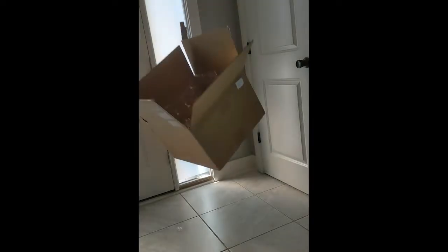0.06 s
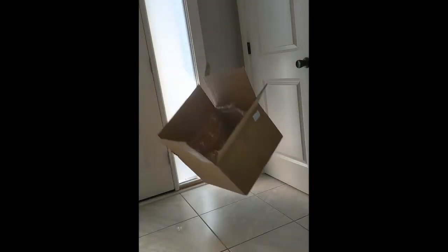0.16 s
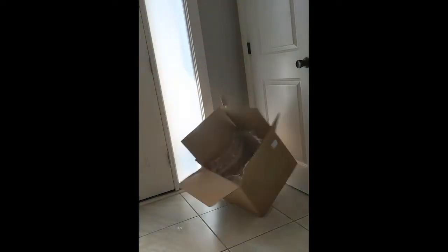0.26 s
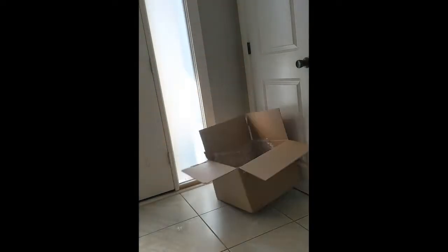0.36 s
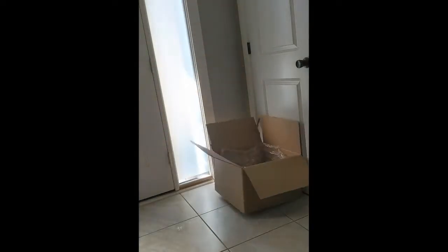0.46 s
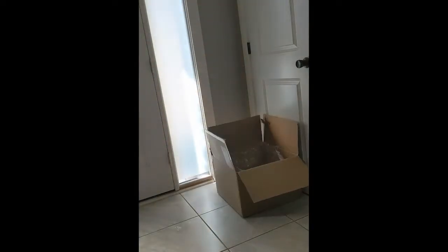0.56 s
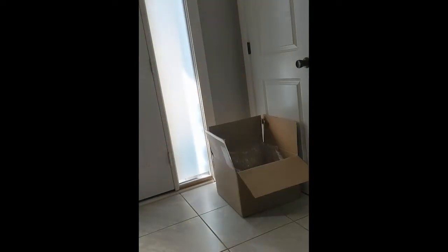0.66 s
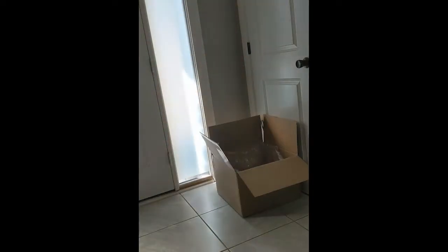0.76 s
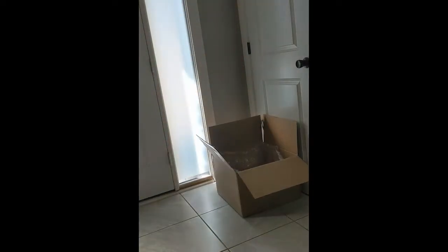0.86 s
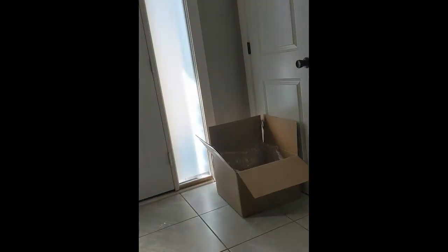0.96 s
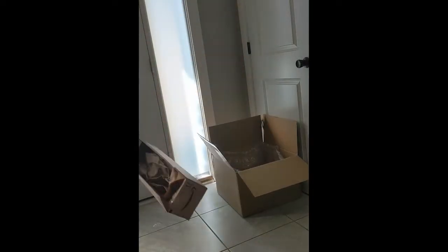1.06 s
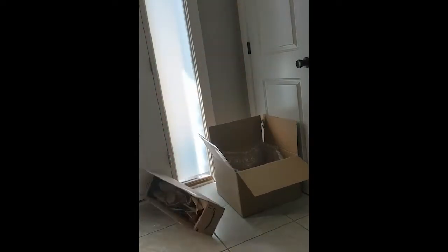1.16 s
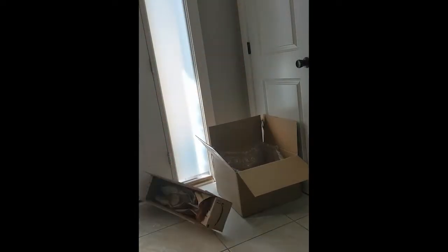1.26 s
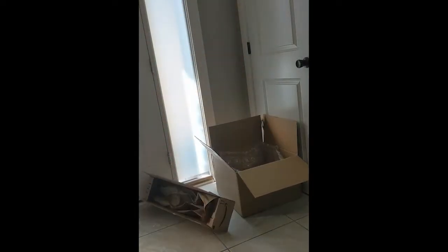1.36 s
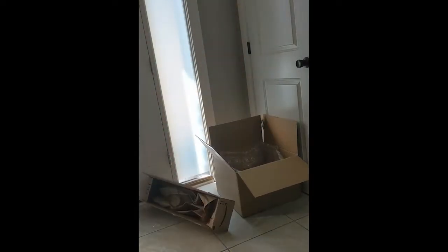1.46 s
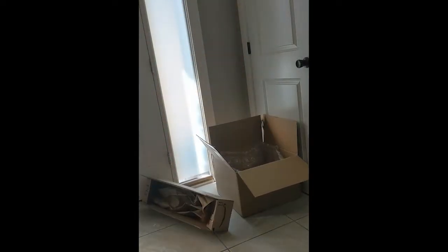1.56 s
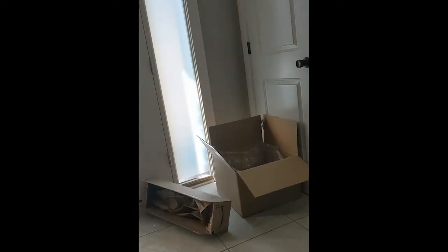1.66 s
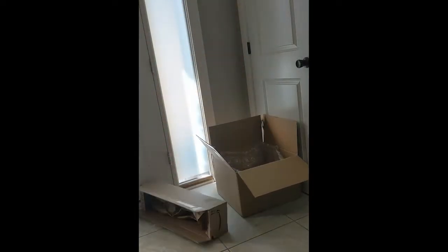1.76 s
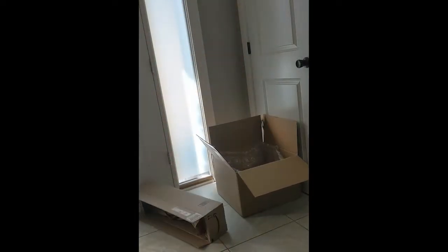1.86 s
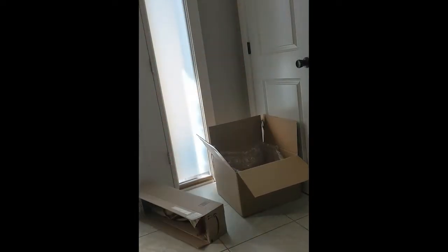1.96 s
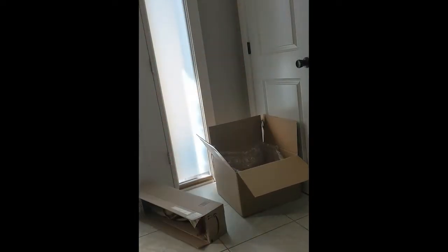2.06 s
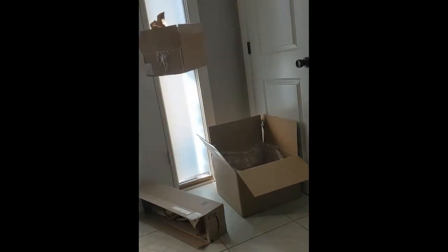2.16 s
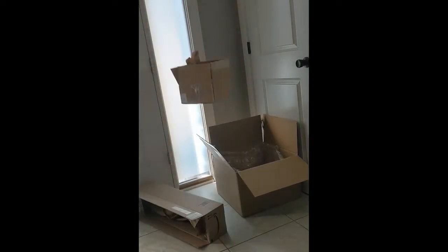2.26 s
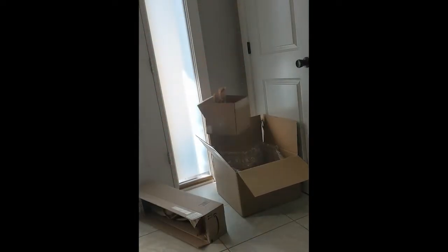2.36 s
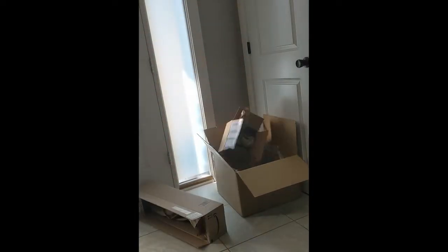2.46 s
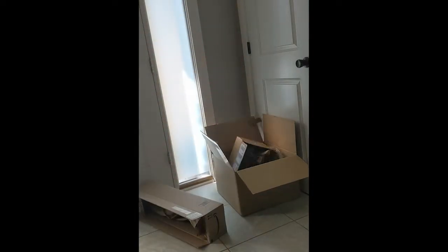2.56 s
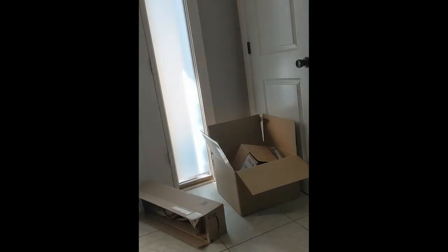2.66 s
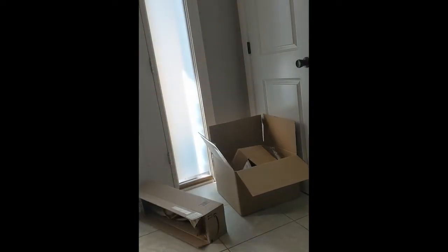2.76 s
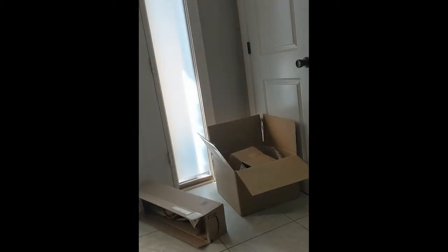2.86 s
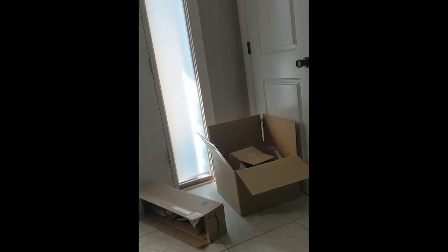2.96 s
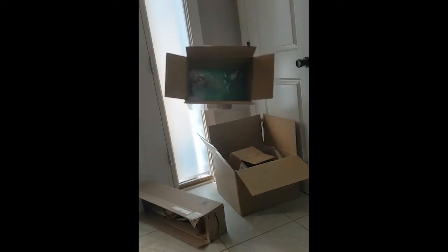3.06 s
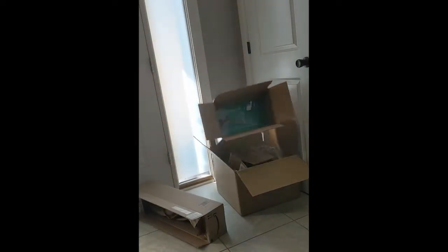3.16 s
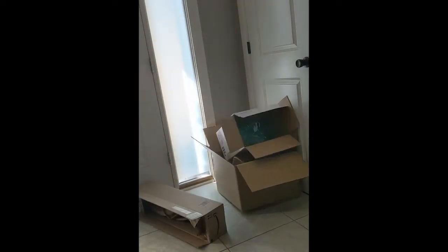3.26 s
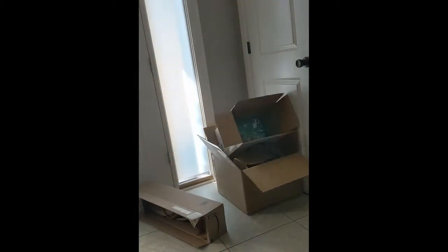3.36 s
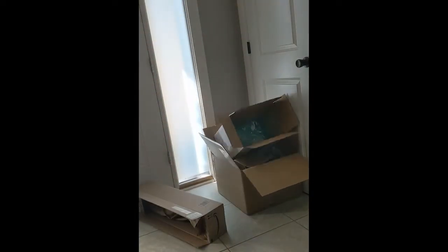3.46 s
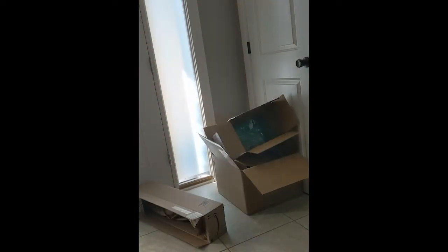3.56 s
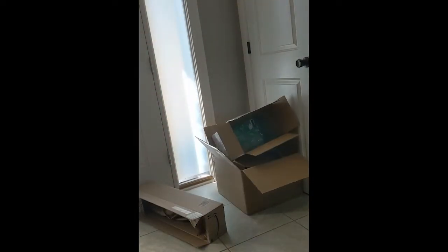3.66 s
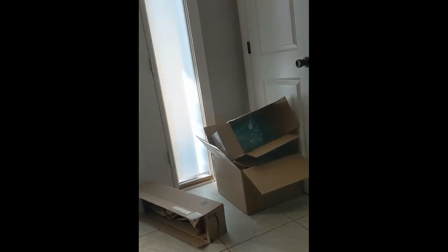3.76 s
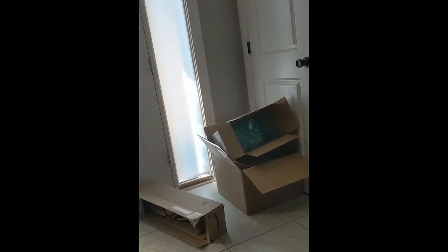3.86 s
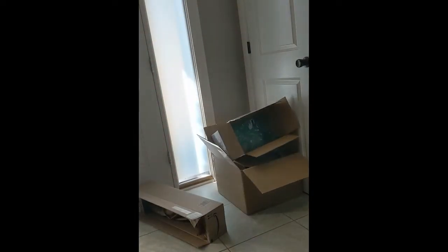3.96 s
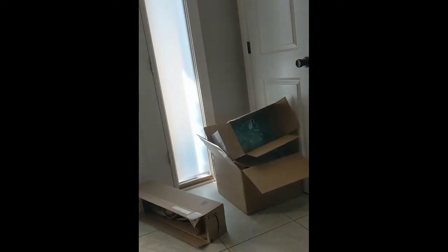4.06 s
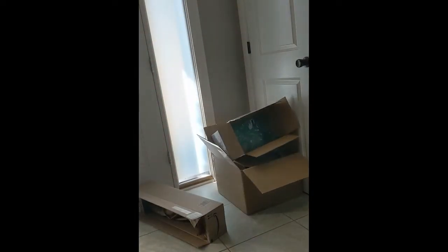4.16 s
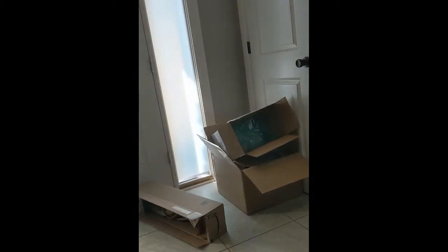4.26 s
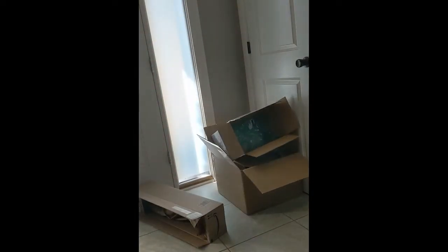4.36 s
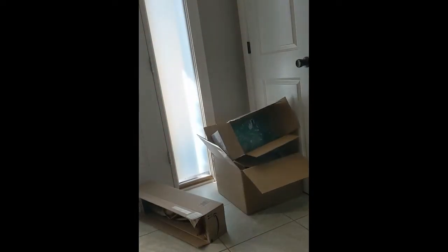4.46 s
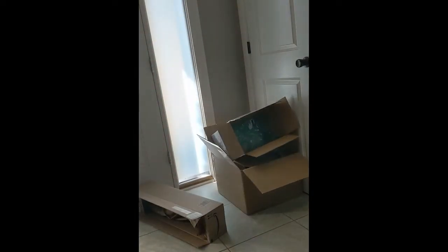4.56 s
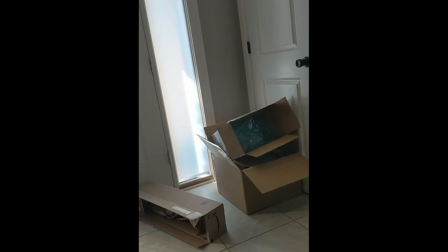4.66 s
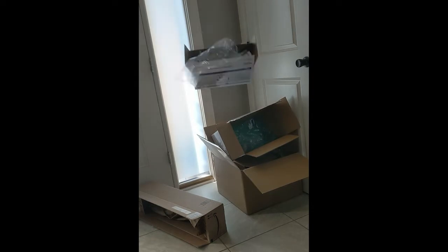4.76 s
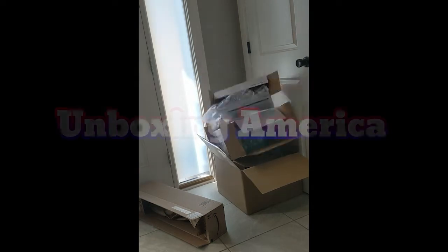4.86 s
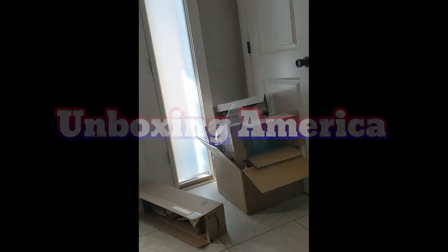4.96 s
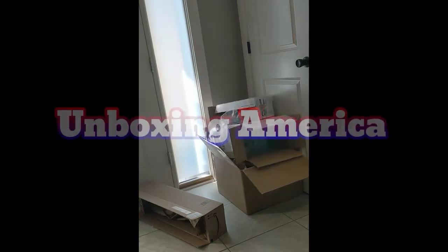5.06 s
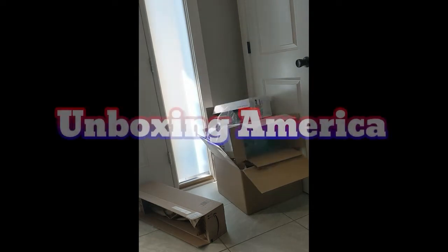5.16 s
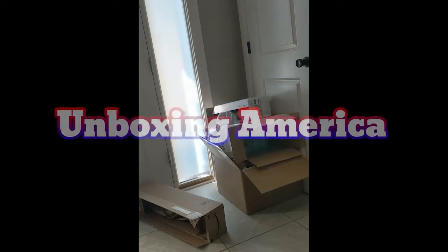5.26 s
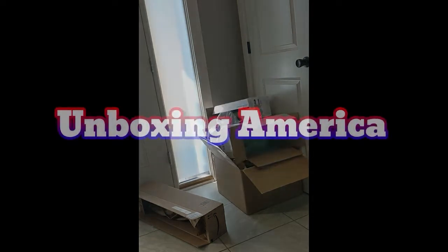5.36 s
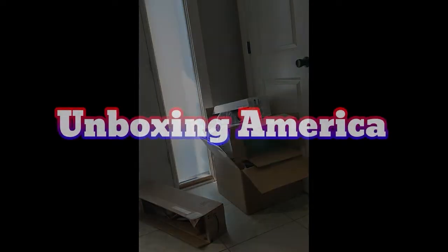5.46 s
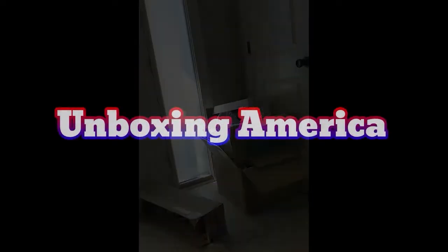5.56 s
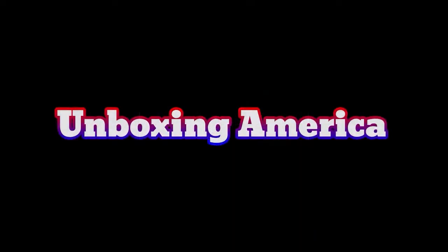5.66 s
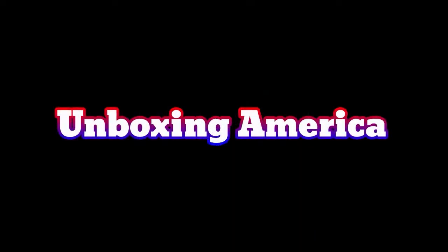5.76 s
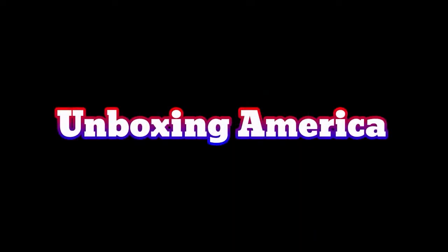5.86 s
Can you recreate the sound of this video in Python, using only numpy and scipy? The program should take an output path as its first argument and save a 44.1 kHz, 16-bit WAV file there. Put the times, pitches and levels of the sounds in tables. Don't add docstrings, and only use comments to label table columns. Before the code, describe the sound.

Five hollow cardboard thuds with abrupt cuts between them, a crisp film-like crackle before the last, then sudden silence in a tiled entryway.

```python
import sys
import numpy as np
from scipy import signal
from scipy.fft import rfft, irfft
from scipy.io import wavfile
from scipy.ndimage import uniform_filter1d

SR = 44100
rng = np.random.default_rng(int(sys.argv[2]) if len(sys.argv) > 2 else 0)


def generate_wav(sig):
    pcm = np.round(np.clip(np.atleast_2d(sig).T, -1, 1) * 32767).astype(np.int16)
    wavfile.write(sys.argv[1], SR, pcm)


def linear_from_db(decibels):
    return 10 ** (np.asarray(decibels, float) / 20)


N = 260542
SIDES = np.array([[1], [-1]])

# time in seconds; first is the start, last the end.
CUTS_S = [0, 1.045, 2.207, 3.11, 3.97, 4.79, 5.52]

# start in seconds, peak in dB, box air pitch in Hz, ring T60 in seconds, knock in dB.
BLOWS = [(0.326, -6, 315, 0.048, -5), (0.328, 3.5, 195, 0.04, -31), (0.338, 4.5, 231, 0.071, -29.5),
         (0.555, -7.5, 274, 0.083, -19), (1.243, -9, 287, 0.092, -16.5), (1.25, -10, 186, 0.094, -13),
         (1.278, -15, 193.2, 0.16, -33), (1.914, -25.5, 171, 0.092, -24), (1.95, -23, 225, 0.2, -47),
         (2.045, -47.5, 208, 0.16, -59), (2.462, 1, 390, 0.044, -34), (2.48, -5, 420, 0.1, -32),
         (2.5363, 3.5, 272.4, 0.11, -15.5), (2.589, -16, 334, 0.096, -32), (2.752, -28, 251, 0.068, -23),
         (2.782, -17, 518, 0.041, -34), (3.283, -9.5, 251, 0.066, -60), (3.301, 3.5, 241, 0.13, -24),
         (3.338, -6.5, 407, 0.22, -1), (3.408, -10, 380, 0.051, -15), (4.905, -3, 226.3, 0.079, -21.5),
         (4.938, -3.5, 290, 0.07, -29), (4.9505, -3.5, 1094, 0.044, -16.5), (4.962, -2.5, 335, 0.077, -3.5)]
# start in seconds,
# peak in dB, pitch in Hz, ring T60 in seconds.
RINGS = [(2.49, -8.5, 425.6, .05), (2.552, -7.5, 559, 0.056), (4.9415, -12, 291, 0.055),
         (1.318, -6.5, 420, 0.051), (0.183, -45, 2980, .03), (0.333, -4.5, 105.3, 0.32),
         (0.337, -13.5, 2790, 0.039), (1.03, -45.5, 1544, 0.057), (1.9, -32, 1720, 0.033),
         (1.92, -20, 511.5, 0.09), (1.969, -17.5, 190.8, 0.033), (2.471, -7.5, 416, 0.049),
         (2.5477, -1, 271.5, 0.067), (3.341, -14, 2456, 0.032), (3.352, -13.5, 2188, .03),
         (4.963, -2, 305.8, 0.062), (0.337, -16.5, 1098, 0.036), (0.345, -2.5, 816, 0.043),
         (0.36, -5, 778, 0.066), (0.358, -6.5, 209.5, .08), (0.383, -5.5, 233, 0.076),
         (0.4, -10, 325, 0.062), (1.247, -6, 1574, 0.043), (1.255, -5.5, 520, 0.14),
         (1.263, -3.5, 330, 0.044), (1.277, -7, 853, 0.033), (1.285, -11.5, 260, 0.041),
         (1.291, -4, 1607, 0.039), (1.304, -7, 486, 0.11), (1.338, -3.5, 620, 0.07),
         (1.395, -5.5, 658, 0.15), (2.461, -13, 1060, 0.025), (2.47, -16.5, 1617, 0.11),
         (2.472, -5.5, 897, 0.024), (2.544, 1, 691, 0.045), (2.582, -6.5, 692, 0.032),
         (2.576, -18.5, 1700, 0.029), (3.279, -29.5, 1600, 0.033), (3.319, 1, 263, 0.03),
         (3.328, -4, 856, 0.054), (3.331, -0.5, 450, 0.053), (3.373, -23, 1650, 0.044),
         (3.405, -11.5, 617, .03), (3.412, -15.5, 1766, .05), (4.953, -8.5, 200, 0.038),
         (4.957, -7.5, 756, .04), (4.98, -1, 340, 0.082), (4.997, -3.5, 330, 0.061), (5.029, -9, 300, 0.25),
         (5.064, -3.5, 330, 0.042),
         (.558, -8.5, 300, 0.051), (.566, -11, 200, .05), (2.7545, -19, 1200, .03), (1.25, -6, 201.3, .1),
          (1.455, -19, 1550, .05), (4.289, -17, 550, .05), (4.323, -11, 860, .06), (4.387, -14, 900, .05),
          (4.4, -14.5, 600, .05), (4.406, -11, 1000, .04), (3.305, -2.5, 240, .07),
          (3.3097, -4.5, 240, .04), (3.335, -7.5, 520, .04), (2.4625, -7.5, 330, .04),
          (2.485, -8.5, 430, .05), (2.5376, -6, 1052, 0.016), (2.538, -5, 520, .04),
          (2.555, -4.5, 275, .08), (4.9099, -6.5, 230, .05), (4.952, -4.5, 600, .03),
          (4.953, -8, 1150, .04), (5.003, -3.5, 320, .05), (5.035, -9.5, 310, .05), (1.256, -5, 560, .03),
          (1.287, -4, 250, .04), (1.307, -5.5, 300, .04), (1.342, -8, 640, .04), (1.374, -15.5, 1550, .05),
          (1.41, -15.5, 1550, .05), (1.45, -15, 1000, .06), (1.41, -8, 700, .05), (1.47, -20, 950, .05),
          (1.28, -13, 1600, .04)]

# start in seconds, panel, hollow and corrugation levels in dB,
# hold in seconds.
JOLTS = [(0.163, -72.5, -69.5, -59.5, 0.036), (0.326, -16.5, -14, -24, 0.026),
         (0.387, -20.5, -34.5, -37.5, 0.096), (0.548, -17, -26, -32.5, 0.0071),
         (0.631, -29, -64, -40, 0.022), (1.242, -14, -13, -22, 0.014), (1.263, -12.5, -14, -17.5, 0.046),
         (1.304, -35.5, -18, -31, 0.035), (1.384, -27, -21.5, -31, 0.061),
         (1.904, -35.5, -36, -43.5, 0.037), (2.029, -35, -44.5, -57, 0.017),
         (2.458, -15.5, -26, -31, 0.021), (2.53, -20.5, -22.5, -32, 0.05),
         (2.744, -37, -34.5, -42.5, 0.039), (2.842, -52, -50.5, -51.5, 0.12),
         (3.294, -15.5, -18.5, -29, 0.066), (3.333, -13.5, -24, -20.5, 0.015),
         (3.677, -49, -45, -47.5, 0.022), (3.86, -57, -54, -57.5, 0.029), (2.184, -75.5, -55.5, -60, 0.14),
         (4.904, -18.5, -26, -34.5, 0.038), (4.946, -11.5, -12.5, -22, 0.032),
         (5.051, -22.5, -31, -33, 0.018), (5.258, -40.5, -41, -48.5, 0.011)]
NUDGES = [
    (0.019, -86, -61, -61.5, 0.058),
    (1.008, -63, -77, -61.5, 0.019),
    (1.17, -61.5, -61, -65, 0.049),
    (1.886, -57.5, -53, -50.5, .012),
    (3.277, -60, -41.5, -53, .015),
    (4.786, -68.5, -56.5, -57.5, 0.056),
]
JOLT_RISE_S, REBOUND_DB_PER_S = 0.0082, 499
# seconds, for panel, hollow, corrugation.
JOLT_LAG_S = [.012, .003, 0.0]
# level re jolt in dB, fall in dB per second.
SETTLING = [(-3, 128.5), (0, 110), (2, 142)]

# resonance in Hz, width in Hz, level in dB.
PANELS = [(111, 41, -3), (156.6, 65.4, -2), (243, 56, 1), (267, 101.6, -0.5)]
# level in dB, by take.
BIG_PANEL_DB = [-5.5, -15.5, -7.5, -9, -9, -6.5]
# resonance in Hz, width in Hz, level in dB.
HOLLOW = [(389, 51, -3), (518, 144.6, 1), (585.6, 129, 3), (796, 310, -4), (1070, 330, -9)]
# resonance in Hz, width in Hz, level in dB.
NARROW_BOX = [(428, 57, -3.5), (534, 51, -2.5), (658, 108, -2.5), (980, 133, -12)]
# resonance in Hz, width in Hz, level in dB.
FLUTES = [(1200, 250, -2), (1510, 300, -1.5), (1940, 966, -5)]

# start in seconds, level in dB, hold in seconds, fall in dB per second.
RUSTLES = [(0.0, -58, 0.0079, 201), (0.175, -68, .02, 99.5), (0.0, -59, 0.11, 93),
           (0.33, -21.5, 0.0045, 84), (0.578, -42, 0.098, 185), (0.778, -60, 0.16, 33.5),
           (1.249, -23.5, 0.065, 354), (1.39, -55.5, 0.022, 59), (1.904, -42, 0.048, 200),
           (2.03, -51.5, .01, 150), (2.201, -57, 0.09, 75), (2.463, -30.5, 0.04, 300),
           (2.544, -31, 0.039, 120), (2.704, -43.5, 0.082, 55), (2.858, -50, 0.096, 146),
           (3.297, -28, 0.024, 195), (3.318, -23, 0.047, 252), (3.404, -35, 0.0076, 108),
           (3.687, -48.5, 0.014, 140), (3.853, -57.5, 0.037, 153), (3.97, -59.5, 0.028, 103),
           (4.004, -48.5, 0.018, 300), (4.798, -57.5, 0.043, 87), (4.91, -34.5, 0.061, 194),
           (4.963, -30.5, 0.057, 123), (5.048, -29, 0.011, 248), (5.11, -62.5, 0.0083, 100),
           (5.255, -50, 0.011, 301)]
RUSTLE_RISE_S = 0.0049
# frequency in Hz, density in dB per Hz.
FILM = [(1500, -30), (2300, -7.5), (2900, -7.5), (4300, -2), (5800, -4.5), (8000, -5), (12000, -10.5),
        (16000, -17)]
# time in seconds, dull over crisp in dB.
FOLDS = [(0, -10.5), (.17, -4.5), (.33, 0.5), (1.2, 1.5), (1.3, 5), (1.85, 2.5), (1.93, 6.5), (2.44, 4.5),
         (2.47, -3), (3.3, 1), (3.36, 1), (4.03, -1), (4.25, -2.5), (4.29, -4), (4.335, 4), (4.4, 2.5),
         (4.73, -0.5), (4.96, 1)]
CRISP_HZ = 4600
# time in seconds, pull in dB, weight on the boxes in dB.
DRAG = [
    [(4.013, -61, -68), (4.058, -47, -52.5), (4.064, -34, -50), (4.085, -32.5, -47.5), (4.135, -30.5, -50),
     (4.15, -32, -49.5), (4.167, -29.5, -36.5), (4.223, -30.5, -34), (4.24, -33.5, -42)],
    [(4.2505, -12.5, -31.5), (4.256, -19.5, -31), (4.268, -12.5, -26.5), (4.276, -14, -28),
     (4.3, -17, -27.5), (4.32, -18, -29), (4.35, -13, -25.5), (4.403, -13, -24), (4.423, -19.5, -24.5),
     (4.44, -27, -30), (4.651, -51.5, -53.5), (4.713, -52, -80), (4.785, -47.5, -58)],
]
# share in dB, for panel, hollow, corrugation.
WEIGHT_SHARE_DB = [-8.5, 2.5, 2.5]
SHEET_RIGHT_DB = 1.5
# start in seconds, level in dB, pitch in Hz, hold in seconds.
STRIPS = [
    (4.075, -46.5, 5500, .03),
    (4.252, -32.5, 5900, 0.019),
    (4.29, -31, 3600, .02),
    (4.325, -23.5, 3250, 0.017),
    (4.37, -31.5, 4300, .01),
    (4.34, -34, 6200, 0.048),
    (4.39, -36.5, 7600, 0.016),
    (3.335, -40, 3560, 0.022),
]
STRIP_WIDTH_HZ, STRIP_DB_PER_S = 470, 500.5

# start in seconds, peak in dB, pitch in Hz.
SNAPS = [(0.3283, -11, 5640), (1.2523, -19, 2840), (1.8987, -38, 2840), (2.4671, -26, 9690),
         (3.3005, -17, 7580), (3.4168, -20, 2840), (4.0151, -31, 7190), (4.0282, -21, 4740),
         (4.0472, -30, 7450), (4.0652, -24, 5120), (4.1092, -20, 5380), (4.1526, -21, 8270),
         (4.1584, -20, 5770), (4.1689, -12, 3400), (4.1761, -12, 5730), (4.1786, -13, 7060),
         (4.1972, -9, 5210), (4.1986, -9, 11000), (4.2136, -16, 9520), (4.2177, -7, 7490),
         (4.2196, -11, 5200), (4.2513, -4, 4820), (4.2687, -8, 5770), (4.2999, -8, 7540),
         (4.7063, -36, 7620), (4.7361, -27, 5990), (4.7576, -36, 5560), (4.7784, -34, 3830),
         (4.9058, -24, 2900), (4.9525, -17, 1400)]
# start in seconds, peak in
# dB, pitch in Hz.
CRINKLES = [(3.9683, -48, 7500), (3.9957, -46, 5480), (4.008, -47, 7500), (4.012, -43, 3690),
            (4.018, -36, 9500), (4.041, -38, 11500), (4.078, -33, 5700), (4.083, -31, 5200),
            (4.09, -31, 7500), (4.116, -30, 9600), (4.123, -28, 5700), (4.145, -23, 7500),
            (4.187, -23, 9600), (4.195, -26, 7500), (4.237, -21, 5700), (4.2575, -17, 7500),
            (4.353, -4, 3400), (4.657, -35, 9600), (4.682, -43, 7500), (4.743, -39, 7500),
            (4.754, -34, 5710), (4.762, -40, 3500), (4.783, -43, 7500), (2.755, -35, 1500),
            (3.342, -19, 2500), (3.367, -19, 3500), (5.068, -29, 9600)]
SNAP_DECAY_S = 0.0008
# start in seconds, level in dB, length in seconds, slips per second.
CREAKS = [
    (3.701, -50.5, 0.037, 490),
    (3.759, -61.5, 0.069, 400),
    (3.858, -56, 0.043, 445),
]

# start in seconds, door in dB, wall in dB.
SHOVES = [(0.0, -58, -58), (0.326, -22.5, -19.5), (.53, -34.5, -26), (.8, -47, -43), (1.245, -48, -35),
          (1.36, -45.5, -60), (1.92, -64, -47.5), (2.46, -53, -31.5), (2.58, -40.5, -26.5),
          (2.85, -54.5, -45), (3.29, -24, -23.5), (4.25, -63, -66), (4.909, -23.5, -27), (5.0, -42, -30),
          (5.4, -48, -59.5), (.14, -61, -77), (2.2, -73, -78), (3.12, -66, -74.5), (3.6, -48, -52),
          (4.7, -64.5, -75), (4.6, -70, -57.5)]
DOOR_HZ, DOOR_RISE_S, DOOR_HOLD_S, DOOR_DB_PER_S = 31.6, 0.13, 0.0075, 92.5
WALL_HZ, WALL_RISE_S, WALL_HOLD_S, WALL_DB_PER_S = 61.8, 0.011, 0.016, 128

RISE_FROM_DB = -12
# level in dB, for panel, hollow, corrugation, film, door, wall.
REST_DB = [-61, -67.5, -67, -70.5, -76.5, -72]
# stirring offset in dB, by take.
REST_TAKE_DB = [-1, -3.5, 1, -0.5, 2, -6.5]
STIR_DB, STIR_HZ = 3, 3.6

# frequency in Hz, T60 in seconds.
HALL_T60 = [(60, 0.92), (200, 0.42), (600, 0.54), (1500, 0.73), (4000, 0.54), (10000, 0.292)]
# frequency in Hz, level in dB.
HALL_LEVEL = [(60, -9.5), (250, 0), (600, -3), (2000, -2.5), (12000, 7.5)]
# frequency in Hz, left-right likeness 0 to 1.
HALL_LIKENESS = [(60, 0.76), (250, 0.83), (600, 0.13), (1500, 0.3), (4000, 0.068), (12000, .03)]

# frequency in Hz, density in dB.
QUIET = [(12, -25), (20, 9), (41, -1), (96, -35.5), (270, -9), (367, -10.5), (485, -26), (558, -19),
         (976, -17.5), (1060, -19), (2460, -32.5), (3440, -31), (16000, -41)]
QUIET_DB = -63

# resonance in Hz, width in Hz, lift in dB.
PORT = [(1650, 300, 3), (2100, 500, -5), (3300, 900, 5), (5700, 700, 7), (6550, 500, -4), (7600, 500, 7),
        (9700, 700, 6), (11600, 600, 6), (13900, 800, 3)]
# frequency in Hz, left minus right in dB.
LEFT_LEAD = [(60, 1), (150, 1), (400, 6.5), (1200, 0), (4400, -1), (8000, -3), (14000, 1.5)]
# frequency in Hz, left lead in radians.
LEFT_PHASE = [(50, .15), (150, .45), (400, .4), (1000, 0.36), (4000, 1.9), (16000, 4.6)]
TOP_HZ = 16150


def unit(x):
    return x / np.sqrt(np.mean(x ** 2) + 1e-30)


def at_hz(points, hz):
    table = np.array(points)
    return np.interp(np.log(np.maximum(hz, 1)), np.log(table[:, 0]), table[:, 1])


def shape(x, gain):
    n = x.shape[-1]
    return irfft(rfft(x) * gain(np.fft.rfftfreq(n, 1 / SR)), n)


def ring(x, hz, t60):
    r, w = linear_from_db(-60 / (t60 * SR)), 2 * np.pi * hz / SR
    return signal.lfilter([0, np.sin(w)], [1, -2 * r * np.cos(w), r * r], x + 1e-18)


def resonate(x, hz, width):
    r, w = np.exp(-np.pi * width / SR), 2 * np.pi * hz / SR
    return signal.lfilter(np.array([1, 0, -1]) * (1 - r * r) / 2, [1, -2 * r * np.cos(w), r * r], x)


def by_take(values):
    return np.array(values)[np.searchsorted(CUTS_S[1:-1], np.arange(N) / SR)]


def in_time(spans):
    out = np.zeros((len(spans[0][0]) - 1, N))
    for s, *levels in map(np.transpose, spans):
        a = round(s[0] * SR)
        t = np.arange(a, N) / SR
        out[:, a:] = [np.interp(t, s, level) for level in levels]
    return out


def stroke(s, db, rise, hold, fall_db):
    out = np.zeros(N)
    end = min(cut for cut in CUTS_S if cut > s + .03)
    a, b = round(max(s, 0) * SR), round(end * SR)
    t = np.arange(b - a) / SR
    rising_db = RISE_FROM_DB * np.clip(1 - t / rise, 0, 1)
    falling_db = fall_db * np.maximum(t - rise - hold, 0)
    out[a:b] = linear_from_db(2 * (db + rising_db - falling_db))
    return out


def soft_tap(length):
    tap, push = np.zeros(8192), np.hanning(length)
    tap[:length] = push / push.sum()
    return tap


def blows():
    out, t = np.zeros(N), np.arange(8192) / SR
    for (s, db, hz, t60, knock_db), noise in zip(BLOWS, rng.standard_normal((len(BLOWS), 8192))):
        tap = soft_tap(round(.6 * SR / hz))
        note = ring(tap, hz, t60) + 0.24 * ring(tap, 1.6 * hz, 0.19 * t60)
        knock = resonate(noise * np.exp(-t / 0.0039), 950, 1300)
        knock = resonate(knock, 980, 600) + 0.37 * resonate(knock, 1500, 500)
        knock /= np.abs(knock).max()
        out[round((s + .0015) * SR):][:8192] += linear_from_db(knock_db - 8.5) * knock - linear_from_db(db - 7.0) * note
    return out


def panel_rings():
    out = np.zeros(N)
    for s, db, hz, t60 in RINGS:
        out[round(s * SR):][:8192] -= linear_from_db(db - 4.5) * ring(soft_tap(round(SR / hz)), hz, t60)
    return out


def resting():
    restless_db = STIR_DB * unit(resonate(rng.standard_normal(N), STIR_HZ, 2 * STIR_HZ))
    return linear_from_db(2 * (np.array(REST_DB)[:, None] + by_take(REST_TAKE_DB) + restless_db))


def motion():
    power = resting()[:4]
    for s, *levels, hold in JOLTS + NUDGES:
        for k, (db, (under_db, fall_db)) in enumerate(zip(levels, SETTLING)):
            at = s + JOLT_LAG_S[k]
            power[k] += stroke(at, db, JOLT_RISE_S, hold, REBOUND_DB_PER_S)
            power[k] += stroke(at, db + under_db, JOLT_RISE_S, hold, fall_db)
    for s, db, hold, fall_db in RUSTLES:
        power[3] += stroke(s, db, RUSTLE_RISE_S, hold, fall_db)
    still_end = (N / SR, -120, -120)
    before = [(0, -120, -120), still_end]
    after = [(CUTS_S[5], -120, -120), still_end]
    pull_db, weight_db = in_time([before] + DRAG + [after])
    power[:3] += linear_from_db(2 * (weight_db + np.array(WEIGHT_SHARE_DB)[:, None]))
    power[3] += linear_from_db(2 * pull_db)
    return np.sqrt(power)


def grains(per_s, spread_db):
    sizes = linear_from_db(spread_db * np.minimum(rng.exponential(1, N), 4)) * rng.choice([-1, 1], N)
    return sizes * (rng.random(N) < per_s / SR) + 1e-18


def rattle(peaks, per_s, spread_db, wide):
    knocks = grains(per_s, spread_db) + wide * grains(per_s, spread_db) * SIDES
    out = np.zeros((2, N))
    for k, (hz, width, db) in enumerate(peaks):
        broad = resonate(knocks, hz, 6.8 * width)
        out += (-1) ** k * linear_from_db(db) * resonate(broad, hz, width)
    return unit(out)


def cardboard(panel, hollow, scrape):
    big = linear_from_db(by_take(BIG_PANEL_DB)) * rattle(PANELS[:1], 1000, 3.4, wide=0.18)
    out = linear_from_db(-8.0) * panel * (rattle(PANELS[1:], 1000, 2.5, wide=0.13) + big)
    narrow = by_take([0, 1, 0, 0, 0, 0])
    out += linear_from_db(-7.5) * hollow * (1 - narrow) * rattle(HOLLOW, 2500, 3.2, wide=0.36)
    out += linear_from_db(-6.5) * hollow * narrow * rattle(NARROW_BOX, 3000, 2.5, wide=0.2)
    return out + linear_from_db(-6.5) * scrape * rattle(FLUTES, 2600, 0.63, wide=0.6)


def rustle():
    clumps = linear_from_db(2.0 * unit(resonate(rng.standard_normal(N), 60, 110)))
    crinkles = (grains(8000, 2.0) + grains(8000, 2.0) * SIDES) * clumps
    film = unit(shape(crinkles, lambda hz: linear_from_db(at_hz(FILM, hz))))
    dull = shape(film, lambda hz: 1 / (1 + (hz / CRISP_HZ) ** 6))
    fold_db, = in_time([FOLDS])
    return linear_from_db(fold_db / 2) * dull + linear_from_db(-fold_db / 2) * (film - dull)


def strips(film):
    out = np.zeros((2, N))
    for s, db, hz, hold in STRIPS:
        gain = np.sqrt(stroke(s, db, RUSTLE_RISE_S, hold, STRIP_DB_PER_S))
        out += gain * unit(resonate(film, hz, STRIP_WIDTH_HZ))
    return out


def snaps(rows):
    out, t = np.zeros(N), np.arange(400) / SR
    for (s, db, hz), noise in zip(rows, rng.standard_normal((len(rows), 400))):
        burst = (noise - .2 * np.roll(noise, 1)) * np.exp(-t / SNAP_DECAY_S)
        burst = 0.98 * burst + 0.82 * resonate(burst, hz, 1700)
        out[round(s * SR):][:400] += linear_from_db(db + 7) * burst / np.abs(burst).max()
    band = signal.butter(2, [1700, 14000], "band", fs=SR, output="sos")
    return signal.sosfilt(band, out + 1e-18)


def creaks():
    slips = np.zeros(N)
    for (s, db, length, per_s), chance in zip(CREAKS, rng.standard_normal((len(CREAKS), 60))):
        at = s + np.cumsum(1 + .08 * chance) / per_s
        slips[(at[at < s + length] * SR).astype(int)] = linear_from_db(db + 5.5)
    return ring(slips, 900, .009) + .6 * ring(slips, 1760, .008) + .6 * ring(slips, 450, .015)


def boom():
    door_power, wall_power = resting()[4:]
    for s, door_db, wall_db in SHOVES:
        door_power += stroke(s, door_db, DOOR_RISE_S, DOOR_HOLD_S, DOOR_DB_PER_S)
        wall_power += stroke(s, wall_db, WALL_RISE_S, WALL_HOLD_S, WALL_DB_PER_S)
    door_gain, wall_gain = uniform_filter1d(np.sqrt([door_power, wall_power]), size=600, origin=250)
    wander = unit(resonate(rng.standard_normal(N), 2.9, 4.0))
    door = np.sqrt(2) * np.sin(2 * np.pi * np.cumsum(DOOR_HZ + 1.5 * wander) / SR)
    wall = unit(resonate(resonate(rng.standard_normal(N), WALL_HZ, 35), WALL_HZ, 35))
    return door_gain * door + linear_from_db(-2.0) * wall_gain * wall


def hallway_response():
    t, out = np.arange(SR) / SR, np.zeros((2, SR))
    edges = 50 * 2 ** np.arange(0, 8.6, .5)
    for low, high in zip(edges, edges[1:]):
        sos = signal.butter(2, [low, high], "band", fs=SR, output="sos")
        mid, side = signal.sosfilt(sos, rng.standard_normal((2, SR)))
        alike = np.clip(at_hz(HALL_LIKENESS, low), 0, 1)
        both = np.sqrt(1 + alike) * mid + np.sqrt(1 - alike) * side * SIDES
        out += both * linear_from_db(at_hz(HALL_LEVEL, low) - 60 * t / at_hz(HALL_T60, low * 1.2))
    out *= np.clip((t - .002) / 0.0029, 0, 1)
    return out / np.sqrt(np.sum(out ** 2) / 2.0)


def hallway(heard):
    echoes, out = hallway_response(), np.zeros((2, N))
    for start, end in zip(CUTS_S, CUTS_S[1:]):
        a, b = round(start * SR), round(end * SR)
        out[:, a:b] = linear_from_db(-5.5) * signal.fftconvolve(heard[:, a:b], echoes, axes=1)[:, :b - a]
    return out


def hum_and_hiss():
    mid, side = rng.standard_normal((2, N))
    side = shape(side, lambda hz: hz / (hz + 600))
    noise = shape(mid + side * SIDES, lambda hz: linear_from_db(at_hz(QUIET, hz)))
    return linear_from_db(QUIET_DB - 2.0) * unit(noise)


def scene():
    panel, hollow, scrape, film_gain = motion()
    boxes = cardboard(panel, hollow, scrape) + blows() + panel_rings() + creaks()
    film = rustle()
    sheet_right_db = by_take([0, 0, 0, 0, 1, 0]) * SHEET_RIGHT_DB
    boxes += (linear_from_db(-4) * film_gain * film + strips(film)) * linear_from_db(-sheet_right_db * SIDES / 2)
    close = (snaps(SNAPS) + snaps(CRINKLES)) * np.ones((2, 1))
    heard = (1.3 * boxes + .3 * close).mean(0, keepdims=True)
    out = boxes + close * linear_from_db(-SIDES) + hallway(heard) + boom() + hum_and_hiss()
    return out * np.interp(np.arange(N) / SR, [5.506, 5.521, 5.57], [1, .003, 0])


def roll_off(x):
    return signal.sosfilt(signal.butter(12, 16760, fs=SR, output="sos"), x)


def record(dry):
    x = dry.copy()
    for hz, width, db in PORT:
        x += (linear_from_db(db) - 1) * resonate(dry, hz, width)
    half = SIDES / 2
    x = shape(x, lambda hz: linear_from_db(at_hz(LEFT_LEAD, hz) * half) * np.exp(1j * at_hz(LEFT_PHASE, hz) * half))
    top = .72
    rounded = top * np.tanh(x / top)
    mix = signal.sosfilt(signal.cheby2(24, 60, TOP_HZ, fs=SR, output="sos"), rounded)
    return roll_off(mix)


dry = scene()
out = record(dry)
generate_wav(out)
```